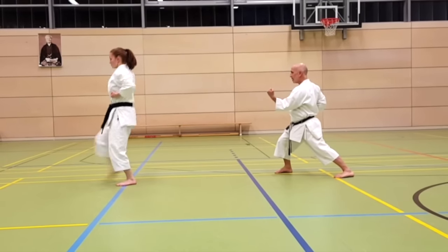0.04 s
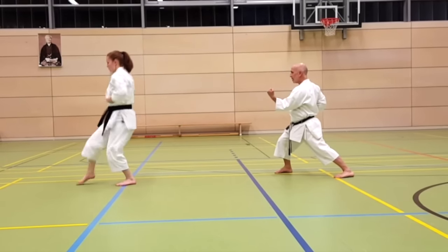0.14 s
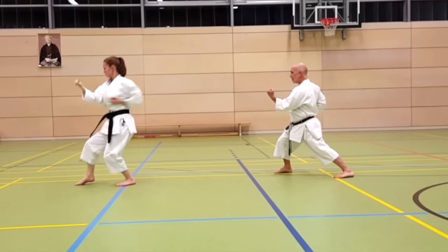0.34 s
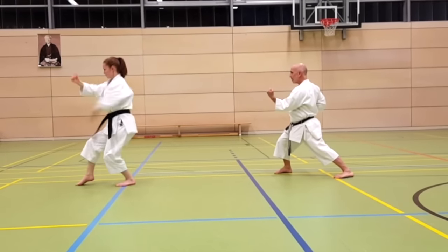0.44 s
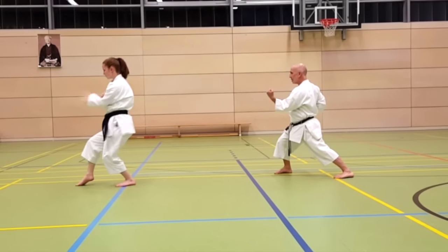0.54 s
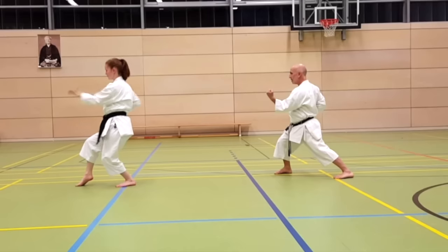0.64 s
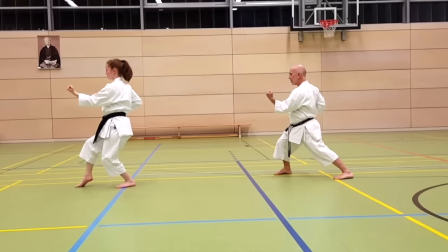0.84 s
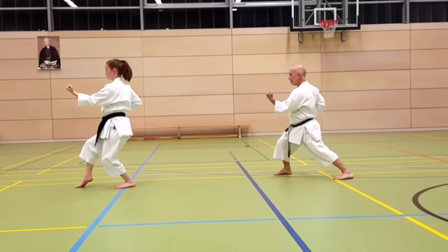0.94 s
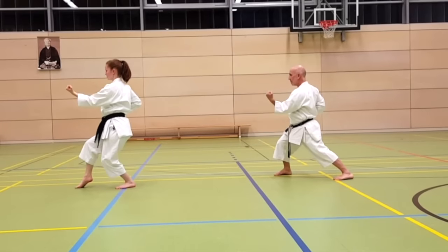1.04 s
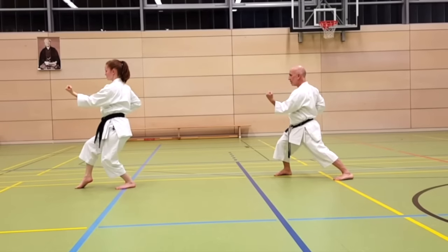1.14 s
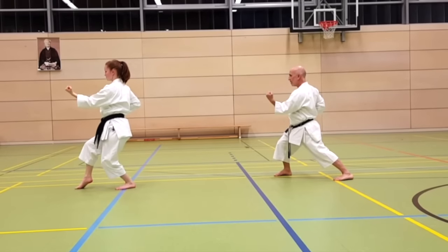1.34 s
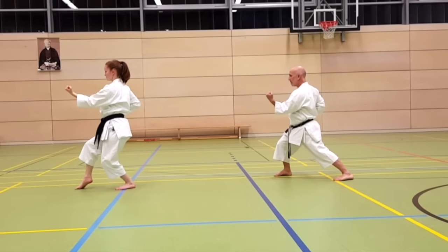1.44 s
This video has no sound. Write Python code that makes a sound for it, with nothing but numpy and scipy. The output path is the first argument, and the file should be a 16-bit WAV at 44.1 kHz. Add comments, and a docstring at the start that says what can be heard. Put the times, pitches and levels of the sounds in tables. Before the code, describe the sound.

A heavy cotton sleeve cracks once in a karate strike, after a soft barefoot step and a rising rustle of cloth. The stereo microphone stands well back in a hard-walled sports hall, catching the long fading echo.

```python
"""Karate strike in a sports hall

A large, hard-walled hall; a stereo microphone, far enough off for the room to rival the direct sound.
Slightly to the right, a bare foot thumps and slides on the sprung floor, a heavy cotton jacket
swishes, and the sleeve whips taut in quickening flaps. Walls answer with a few echoes and a long tail."""
import sys
import numpy as np
from scipy import signal
from scipy.fft import rfft, irfft
from scipy.io import wavfile

SR = 44100
rng = np.random.default_rng(int(sys.argv[2]) if len(sys.argv) > 2 else 0)


def dump_mix(stems):
    """Bounce the given channels to the path in sys.argv[1] as a 16-bit WAV at rate SR."""
    frames = np.atleast_2d(stems).T  # one column per channel
    limited = np.clip(frames, -1, 1)  # hard clip at full scale
    pcm = np.round(limited * 32767).astype(np.int16)
    wavfile.write(sys.argv[1], SR, pcm)


N = 66150
T = np.arange(N) / SR

# cloth rubs as the limbs move: peak t/s, level/dB, rise/s, fall/s, fibre hiss against rustle/dB
SWISHES = [(0.081, -72, 0.045, 0.083, -3), (0.211, -65, 0.049, 0.15, -7.5),
           (0.308, -54.5, 0.031, 0.033, -6), (0.447, -61.5, 0.057, 0.063, -1.5),
           (0.581, -46.5, 0.036, 0.042, -10), (0.594, -40, 0.0096, 0.024, -6)]


def from_db(db):
    """Decibels to gain."""
    return 10 ** (np.asarray(db) / 20)


def rms_one(x):
    """Scale to unit rms."""
    return x / np.sqrt(np.mean(x ** 2) + 1e-20)


def at_hz(table, hz):
    """Read each column of a table at a frequency."""
    table_hz, *columns = np.transpose(table)
    return [np.interp(np.log(hz + 1), np.log(table_hz), column) for column in columns]


def coloured(x, spectrum):
    """Give a steady noise its spectrum; rms 1."""
    db, = at_hz(spectrum, np.arange(N // 2 + 1) * SR / N)
    return rms_one(irfft(rfft(x) * from_db(db), N))


def filtered(x, hz, kind):
    """Second-order Butterworth filter."""
    return signal.sosfilt(signal.butter(2, hz, kind, fs=SR, output="sos"), x)


def resonant_noise(hz, width_hz):
    """Noise through a resonance, twice for steep skirts; rms 1."""
    b, a = signal.iirpeak(hz, hz / (2 * width_hz), fs=SR)
    return rms_one(signal.lfilter(b, a, signal.lfilter(b, a, rng.standard_normal(N))))


def swells(rows):
    """Each movement rises as a bell curve and dies exponentially."""
    power = 0
    for peak_s, db, rise, fall in rows:
        away = np.where(T < peak_s, ((T - peak_s) / rise) ** 2, (T - peak_s) / fall)
        power = power + from_db(db) ** 2 * np.exp(-2 * np.minimum(away, 20))
    return np.sqrt(power)


def pan(x, right_db):
    """Place a sound between left and right."""
    return x * from_db([[-right_db / 2], [right_db / 2]])


def room_noise(spectrum, alike_below_hz=940, apart_db=-6):
    """Diffuse noise, alike in both channels only in the bass."""
    shared = filtered(coloured(rng.standard_normal(N), spectrum), alike_below_hz, "low")
    return shared + from_db(apart_db) * coloured(rng.standard_normal((2, N)), spectrum)


def ventilation(gain_db=-71):
    """Room tone: steady ventilation and hiss."""
    # its spectrum: f/Hz, relative level/dB
    spectrum = [(25, -3), (80, -4), (200, 4), (550, -2), (1000, -7.5), (2500, -11.5), (6000, -17.5),
                (15000, -23.5)]
    return from_db(gain_db) * room_noise(spectrum)


def lingering_ring(gain_db=-58.5, t60_s=3.2):
    """The hall still rings from an earlier movement."""
    # spectrum of the ring: f/Hz, relative level/dB
    spectrum = [(40, -50), (90, -8), (200, 3.5), (350, 0), (600, 7.5), (850, -6.5), (1600, -1.5),
                (4000, -16.5), (15000, -36)]
    return from_db(gain_db - 60 * T / t60_s) * room_noise(spectrum)


def thread_grains(spectrum, per_s=7000, spread_db=2.5):
    """Threads catch and slip in thousands of tiny grains; rms 1."""
    sizes = from_db(spread_db * np.minimum(rng.exponential(1, N), 4))
    signs = rng.choice([-1, 1], N)
    slips = rng.random(N) < per_s / SR
    return coloured(sizes * signs * slips, spectrum)


def cloth_rustle():
    """Cotton rubs on cotton with each move of the limbs."""
    # spectrum of the rub: f/Hz, relative level/dB
    spectrum = [(300, -23), (800, 10), (1500, 4), (2600, 2), (4000, -1.5), (6500, -9), (10000, -34),
                (16000, -45)]
    return thread_grains(spectrum) * swells([row[:4] for row in SWISHES])


def fibre_hiss():
    """The fibres add a fine hiss to each rub."""
    # spectrum of the hiss: f/Hz, relative level/dB
    spectrum = [(1500, -26), (4000, -5), (6000, 2.5), (8500, 3), (11000, -4.5), (16000, -13)]
    rubs = [(peak_s, db + hiss_db, rise, fall) for peak_s, db, rise, fall, hiss_db in SWISHES]
    return thread_grains(spectrum) * swells(rubs)


def jacket_billows():
    """The loose jacket billows and pushes air."""
    # puffs of air: peak t/s, level/dB, rise/s, fall/s
    puffs = [(.21, -65.5, 0.09, 0.074), (.312, -55.5, 0.076, 0.032), (.46, -63.5, 0.042, 0.03),
             (.545, -54, 0.042, 0.036), (.596, -49, 0.017, 0.0099)]
    # their spectrum: f/Hz, relative level/dB
    spectrum = [(30, -12), (70, -10), (130, 0), (230, -0.5), (340, -6.5), (550, -5.5), (900, -9.5),
                (1600, -19), (4000, -49.5)]
    return coloured(rng.standard_normal(N), spectrum) * swells(puffs)


def steps(bend=1.1, bend_s=.006):
    """The sprung floor gives for two or three cycles, sinking in pitch as it takes the weight."""
    # weight lands: t/s, level/dB, settled f/Hz, rise/s
    footfalls = [(.222, -41, 86, .0115), (.593, -52, 112, .008)]
    out = np.zeros(N)
    for start, db, hz, rise in footfalls:
        age = np.maximum(T - start, 0)
        cycles = hz * (age + bend * bend_s * (1 - np.exp(-age / bend_s)))
        envelope = age / rise * np.exp((1 - (age / rise) ** 2) / 2)
        out += from_db(db) * envelope * np.sin(2 * np.pi * cycles)
    return out


def sole_slides():
    """A bare sole slides on the floor as the stance shifts and settles."""
    # slides: peak t/s, level/dB, rise/s, fall/s
    slides = [(.365, -57.5, 0.0067, 0.019), (.485, -48.5, .02, 0.0032), (.715, -50.5, 0.05, 0.1)]
    return resonant_noise(hz=563, width_hz=227) * swells(slides)


def weave_zips():
    """The sleeve's weave zips along the forearm."""
    # pitches of the weave: f/Hz, width/Hz, relative level/dB
    weave = [(3970, 240, -1), (8330, 400, -3.5)]
    # zips: peak t/s, level/dB, rise/s, fall/s
    zips = [(.44, -68.5, .04, 0.016), (.565, -55, 0.034, 0.018)]
    return sum(from_db(db) * resonant_noise(hz, width) for hz, width, db in weave) * swells(zips)


def fold_cracks():
    """A fold of cloth flips over: a short papery ring and a tick."""
    # cracks: t/s, level/dB, f/Hz, decay/s, tick against ring/dB
    cracks = [(.4545, -49, 1500, .003, -14), (.47, -51, 1200, .003, -20), (.489, -44, 620, .003, -28),
              (.5578, -43, 800, .002, -18), (.5764, -39, 2100, .003, -5), (.586, -37, 900, .0015, -16),
              (.5927, -35, 2300, .003, -8)]
    out = np.zeros(N)
    for peak_s, db, hz, decay, tick_db in cracks:
        out += swells([(peak_s, db, .0004, decay)]) * resonant_noise(hz, width_hz=595)
        out += swells([(peak_s, db + tick_db, .0001, .0006)]) * rng.standard_normal(N)
    return out


def sleeve_whip(gain_db=-2, jitter=.07, overtone_db=-17, hiss_db=-35):
    """A wave runs down the sleeve, flapping faster toward the cuff; each flap spits fibre noise."""
    # course of the whip: t/s, flap rate f/Hz, relative level/dB
    course = [(.5868, 1000, -42), (.5882, 1130, -27), (.5916, 1220, -25.5), (.5926, 1600, -34),
              (.5936, 2900, -36.5), (.5953, 3200, -33), (.597, 3000, -46)]
    times, hz, db = np.transpose(course)
    rate = np.interp(T, times, hz) * (1 + jitter * resonant_noise(hz=292, width_hz=300))
    phase = 2 * np.pi * np.cumsum(rate * (T > times[0])) / SR
    hiss = filtered(rng.standard_normal(N), 2400, "high") * (1 + np.sin(phase)) / 2
    flaps = np.sin(phase) - from_db(overtone_db) * np.cos(2 * phase) + from_db(hiss_db) * hiss
    return flaps * from_db(gain_db + np.interp(T, times, db, left=-200, right=-200))


def karateka():
    """The movement from one direction: (stereo sound at the microphone, sound sent into the hall)."""
    # sound, right minus left/dB, hall send/dB
    layers = [(cloth_rustle(), 2.5, 1),
              (fibre_hiss(), 8, -6),
              (jacket_billows(), 1.5, 3.5),
              (steps(), 1.5, -2),
              (sole_slides(), 6.5, -4),
              (weave_zips(), 2.5, 1),
              (fold_cracks(), 5, 3.5),
              (sleeve_whip(), 5, -4)]
    direct = sum(pan(sound, right_db) for sound, right_db, _ in layers)
    sent = sum(from_db(send_db) * sound for sound, _, send_db in layers)
    return direct, sent


def wall_echoes(x, band_hz=(224, 5300), spread_s=.00022):
    """The nearest wall panels return a few thinned, dulled copies, a little apart in each channel."""
    # single echoes: delay t/s, level/dB
    echoes = [(.0152, -7), (.028, -12), (.0545, -12), (.0595, -13), (.067, -10)]
    out = np.zeros((2, N))
    for delay, db in echoes:
        lags = delay + spread_s * (2 * rng.random(2) - 1)
        out += from_db(db) * np.array([np.interp(T - lag, T, x, left=0) for lag in lags])
    return filtered(out, band_hz, "band")


def hall_response(delay_s=.017, build_s=.008, sag_db_per_s2=19):
    """A diffuse tail that dies band by band, faster as it ages."""
    # hall tail: f/Hz, level/dB, t60 before the sag/s, left-right likeness, right minus left/dB
    tail = [(60, 5.5, 2.5, 0.77, -6), (99, -4.5, 0.6, 0.78, 11), (151, 1.5, 3.5, 1, -2),
            (245, 5.5, 2.87, 0.92, 3), (574, 7.5, 1.42, 0.58, 0.5), (1160, 2, 1.7, 0, 1),
            (1900, 2.5, 1.67, 0, 2.5), (3030, -1.5, 1.78, 0.11, 1.5), (5700, 1, 1.27, 0, 4.5),
            (8700, -0.5, 1.05, 0.14, 6), (14900, -2, 2.3, 0, 7.5)]
    out = np.zeros((2, N))
    edges_hz = np.geomspace(40, 17000, 19)
    white = rng.standard_normal((2, 2, N))
    age = np.maximum(T - delay_s, 0)
    shape = (1 - np.exp(-age / build_s)) * from_db(-sag_db_per_s2 * age ** 2)
    for k, (low, high) in enumerate(zip(edges_hz, edges_hz[1:])):
        db, t60, alike, right_db = at_hz(tail, np.sqrt(low * high))
        mid, side = filtered(white[k % 2], [low, high], "band")  # neighbours get unrelated noise
        band = np.sqrt((1 + alike) / 2) * mid + np.sqrt((1 - alike) / 2) * side * [[1], [-1]]
        fade = shape * from_db(-60 * age / t60)
        out += pan(band, right_db) * from_db(db) * fade / np.sqrt(np.sum(fade ** 2))
    return out


def scene(direction_count=4, right_lag_samples=3):
    """Cloth radiates differently in several directions, and each takes its own way round the hall."""
    directions = [karateka() for _ in range(direction_count)]
    tails = [signal.fftconvolve(sent[None], hall_response(), axes=1)[:, :N] for _, sent in directions]
    hall = sum(tails) / np.sqrt(direction_count)
    left, right = directions[0][0]  # the first direction faces the microphone
    direct = np.array([left, np.pad(right, (right_lag_samples, 0))[:N]])
    return direct + wall_echoes((left + right) / 2) + hall + lingering_ring() + ventilation()


def record(dry, low_cut_hz=97, top_hz=15680):
    """The microphone thins the deep bass; the top is cut steeply."""
    thinned = filtered(dry, low_cut_hz, "high")
    return signal.sosfilt(signal.ellip(12, .1, 80, top_hz, fs=SR, output="sos"), thinned)


dry = scene()
out = record(dry)
dump_mix(out)
```